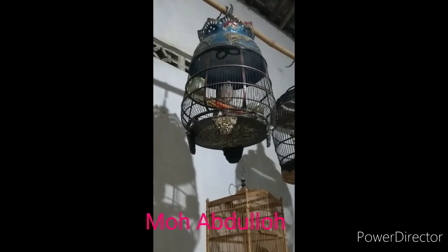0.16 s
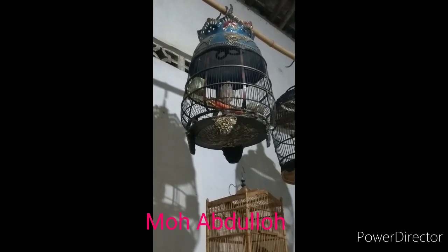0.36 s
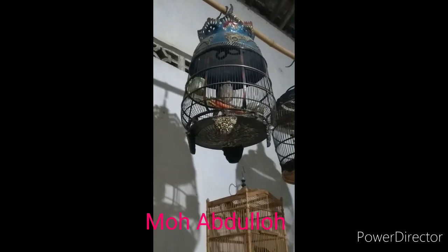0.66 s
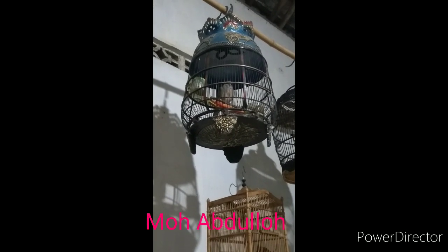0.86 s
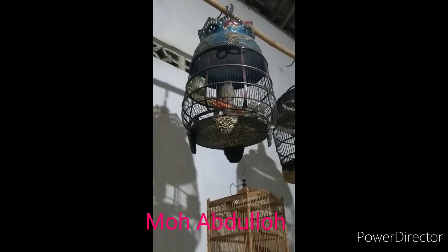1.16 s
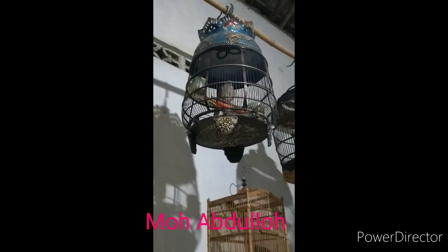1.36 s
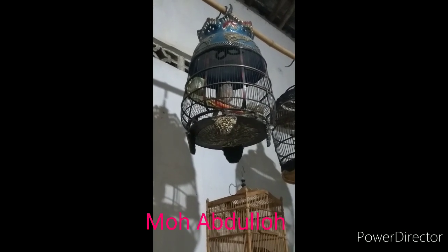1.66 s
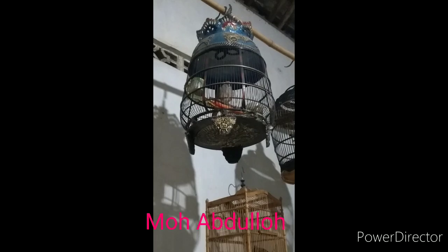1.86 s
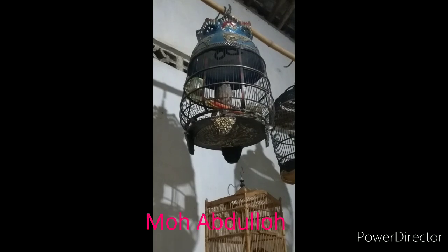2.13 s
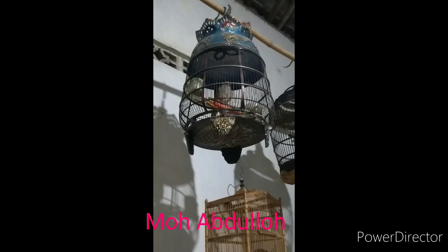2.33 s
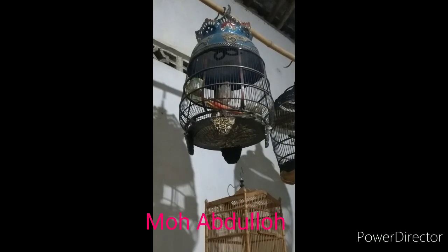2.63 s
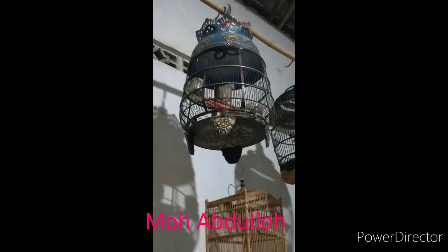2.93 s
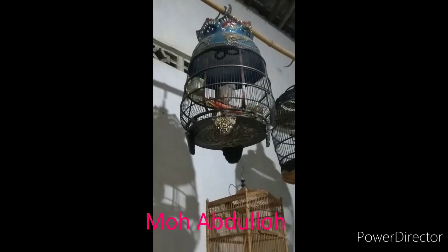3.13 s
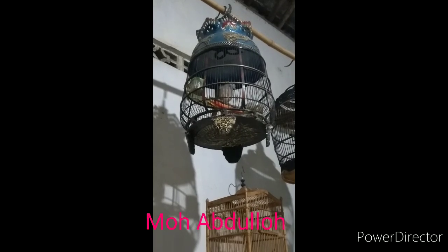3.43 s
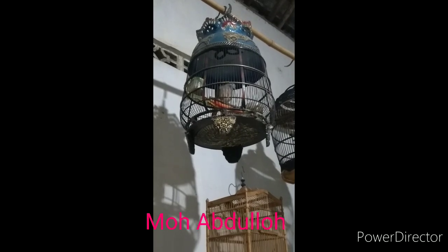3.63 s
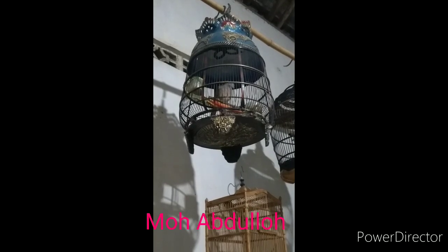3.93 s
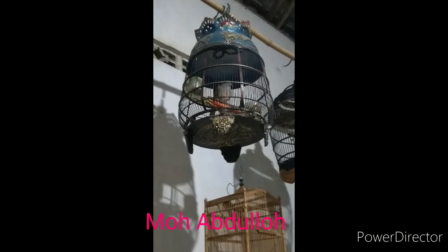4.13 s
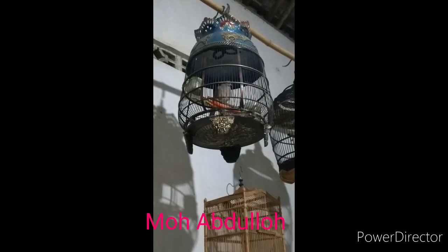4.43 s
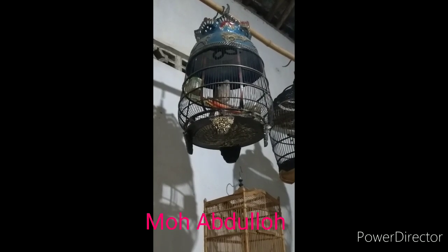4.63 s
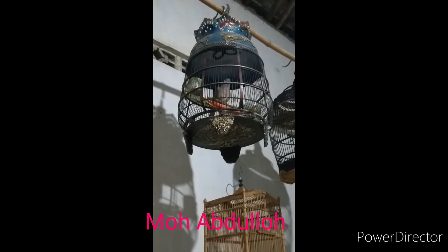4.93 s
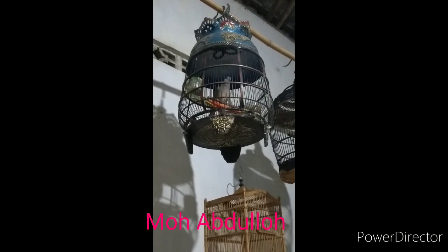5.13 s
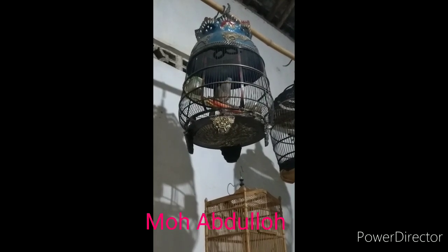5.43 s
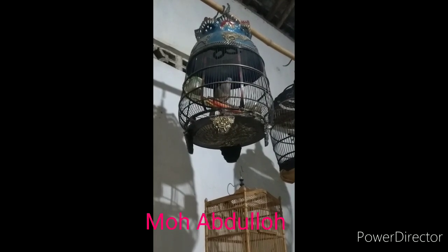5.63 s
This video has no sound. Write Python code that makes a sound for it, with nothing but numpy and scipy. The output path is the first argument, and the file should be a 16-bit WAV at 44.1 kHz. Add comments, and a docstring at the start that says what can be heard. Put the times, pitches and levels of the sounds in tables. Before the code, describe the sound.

Two far, fluttering dove calls and a louder close one ring between porch walls, with light cage rustles and a distant motor hum.

```python
"""Under a porch roof, between hard walls, caged doves coo: two far calls, then a nearer, louder one.
Each note is an almost pure whistle from the bird's voice box that leaps up in pitch and then sags,
blurred by the echo of the walls. A low rumble, a bright hiss and a distant motor's hum go on throughout.
A few rustles and two ticks come from the cages, and a breathy catch leads into the near call."""
import sys
import numpy as np
from scipy import signal
from scipy.fft import rfft, irfft
from scipy.io import wavfile

SR = 44100
rng = np.random.default_rng(int(sys.argv[2]) if len(sys.argv) > 2 else 0)


def unload_wav(signal):
    """Save mono or channel-first audio to the path in sys.argv[1] as 16-bit WAV at rate SR, clipped to [-1, 1]."""
    wavfile.write(
        sys.argv[1],
        SR,
        np.round(np.clip(np.atleast_2d(signal).T, -1, 1) * 32767).astype(np.int16),
    )


N = 254942
HEAD_START = 22050   # samples before time zero, so that echoes are already ringing


def from_db(db):
    """Turn decibels into a number to multiply by."""
    return 10 ** (np.asarray(db) / 20)


def rms_one(x):
    """Scale a signal to an average strength (rms) of 1."""
    return x / np.sqrt(np.mean(x ** 2) + 1e-20)


def at_hz(table, hz):
    """Read between the rows of a (frequency, value) table, with octaves evenly spaced."""
    row_hz, values = np.transpose(table)
    return np.interp(np.log(np.maximum(hz, 1)), np.log(row_hz), values)


def sides(pan_db):
    """Left and right volume; a positive pan is louder on the left."""
    return from_db([[pan_db / 2], [-pan_db / 2]])


def drift(rate, size=N):
    """A smooth random wobble of typical size 1; rate is roughly its changes per second."""
    step = 40   # samples between random points
    memory = np.exp(-2 * np.pi * step * rate / SR)
    slow = signal.lfilter([1], [1, -2 * memory, memory ** 2], rng.standard_normal(size // step + 2002))
    slow = rms_one(slow[2000:])
    return np.interp(np.arange(size) / step, np.arange(len(slow)), slow)


def band(x, low_hz, high_hz):
    """Keep mostly what lies between two frequencies."""
    return signal.sosfilt(signal.butter(2, [low_hz, high_hz], "band", fs=SR, output="sos"), x)


# Dove notes, each opening with a pop: (pop time [s], sag starts after [s], length [s], pop level [dB],
# level after the leap [dB], level at the top [dB], closing level [dB], top pitch [Hz], closing pitch [Hz])
NOTES = [(-.23, 0.19, .265, -12, -35, -36, -33.5, 1225, 1140),
         (0.049, 0.036, .062, -25, -55, -32.5, -34.5, 1120, 1050),
         (0.128, 0.033, 0.0503, -30, -37, -42.5, -34, 1104, 1050),
         (0.236, 0.11, 0.19, -25, -37.5, -40.5, -39.5, 1059, 977),
         (2.386, 0.14, 0.17, -28, -42, -35, -36.5, 1225, 1132),
         (2.582, 0.035, 0.067, -25.5, -34, -42, -34, 1201, 1072),
         (2.664, 0.037, 0.0662, -31, -40.5, -43.5, -36, 1124, 1016),
         (2.762, 0.038, 0.074, -25.5, -34, -47, -38, 1045, 939),
         (2.877, 0.1243, .2, -25.5, -43.5, -35, -46.5, 1141, 994),
         (5.535, 0.0695, 0.19, -18.5, -28, -33, -22, 1351, 1231),
         (5.722, 0.025, .04, -25.5, -20.5, -37, -41, 1168, 1065),
         (5.773, .04, .06, -20.5, -25, -29, -24, 1080, 1070)]
# Faint slides into a call: (time [s], length [s], level [dB], first pitch [Hz], last pitch [Hz])
LEAD_INS = [(2.342, 0.036, -53.5, 1130, 1030), (5.492, 0.047, -41, 1193, 1454)]
def note_shapes(near):
    """The near or far dove's notes, as points to join up: (time [s], pitch [Hz], level [dB])."""
    pop_hz, leap_s, fade_s, near_from_s = 1050, 0.01347, 0.01315, 5.0
    shapes = [[(s, from_hz, db), (s + length, to_hz, db)] for s, length, db, from_hz, to_hz in LEAD_INS]
    for s, sag, length, pop_db, leap_db, top_db, closing_db, top_hz, closing_hz in NOTES:
        close = max(length - fade_s, sag + fade_s)
        shapes.append([(s - .02, 930, pop_db - 20),   # starts low and quiet
                       (s - .008, 1019, pop_db - 9),
                       (s, pop_hz, pop_db),
                       (s + .0038, pop_hz, pop_db - 6.5),
                       (s + leap_s, top_hz - 24.66, leap_db),   # leaps to just under the top
                       (s + sag, top_hz, top_db),
                       (s + close, closing_hz, closing_db),
                       (s + close + fade_s, closing_hz, closing_db - 9)])
    return [shape for shape in shapes if (shape[0][0] > near_from_s) == near]


# How much of the overtones the throat lets out: (frequency [Hz], level next to the whistle [dB])
THROAT = [(2000, -50), (2150, -42), (2550, -41), (2700, -45), (3200, -46), (3900, -56), (4600, -68),
          (5350, -46), (5850, -62), (6350, -36), (6750, -38)]
def dove(shapes, overtones):
    """The voice box whistles into the puffed-up throat, which lets out little but the lowest tone."""
    out = np.zeros(HEAD_START + N)
    pitch_waver = 1 + 0.0052 * drift(rate=59, size=len(out))
    overtone_flicker = from_db(6 * drift(rate=59, size=len(out)))
    for shape in shapes:
        times, hz, level_db = np.transpose(shape)
        at = HEAD_START + np.arange(round(times[0] * SR), min(round(times[-1] * SR), N))
        t = (at - HEAD_START) / SR
        pitch = np.interp(t, times, hz)
        phase = 2 * np.pi * (np.cumsum(pitch * pitch_waver[at]) / SR + rng.random())
        upper_tones = sum(from_db(at_hz(THROAT, k * pitch)) * np.sin(k * phase) for k in overtones)
        tone = np.sin(phase) + overtone_flicker[at] * upper_tones
        soft_ends = np.clip(np.minimum(t - times[0], times[-1] - t) / .005, 0, 1)
        out[at] += np.sqrt(2) * soft_ends * from_db(np.interp(t, times, level_db)) * tone
    flutter = from_db(1.5 * drift(rate=38, size=len(out)))
    return out * pulsing() * flutter


# Quick pulsing in the coos' loudness: (start [s], end [s], rate [pulses per s], depth [0 to 1])
PULSES = [(.253, .47, 32, .95), (2.395, 2.495, 40, .7), (2.888, 3.06, 29, .9), (5.646, 5.75, 45, .85)]
def pulsing():
    """A volume curve that dips with each pulse."""
    volume = np.ones(HEAD_START + N)
    t = np.arange(-HEAD_START, N) / SR
    for start, end, rate, depth in PULSES:
        on = (t > start) & (t < end)
        fade = np.minimum(1, (end - t[on]) * rate)
        volume[on] -= depth * fade * np.sin(np.pi * rate * (t[on] - start)) ** 2
    return volume


# How long the porch rings: (frequency [Hz], time to fade by 60 dB [s])
RING_TIMES = [(500, 0.53), (950, 0.62), (1100, 0.6), (1260, 0.79), (1600, 0.68), (3000, 0.26), (8000, 0.34)]
def porch_echo():
    """The walls throw back a blur of echoes, different in each ear; each band fades at its own speed."""
    t = np.arange(SR) / SR
    edges_hz = 125 * 2. ** np.arange(0, 7.1, .25)
    echo = 0
    for low, high in zip(edges_hz, edges_hz[1:]):
        ring_s = at_hz(RING_TIMES, np.sqrt(low * high))
        noise = band(rng.standard_normal((2, SR)), low, high)
        echo += noise * from_db(-60 * t / ring_s) / np.sqrt(ring_s)
    echo *= 1 - np.exp(-t / .004)   # the first echoes arrive and thicken
    return echo / np.sqrt(np.sum(echo ** 2, axis=1, keepdims=True))


def in_porch(x, echo, pan_db, echo_db, left_lag_samples=0):
    """A sound reaches the ears directly and off the walls; the head start is then dropped."""
    direct = np.stack([np.roll(x, left_lag_samples), x]) * sides(pan_db)
    bounced = signal.fftconvolve(x[None], echo, axes=1)[:, :len(x)]
    bounced *= from_db(echo_db) * sides(pan_db=3)   # the nearer wall is on the left
    return (direct + bounced)[:, HEAD_START:]


# Tone of the low rumble: (frequency [Hz], relative level [dB])
RUMBLE = [(15, -30), (30, 0.5), (64, -0.2), (98, -6.5), (204, -6.5), (267, -9.5), (306, -7), (378, -13),
          (430, -10), (600, -11.5), (780, -9), (1100, -13), (2500, -17.5), (3250, -26), (5500, -121)]
# Tone of the bright hiss: (frequency [Hz], relative level [dB])
HISS = [(1470, -66), (2500, -7), (3020, -5.5), (3900, -5.5), (5020, -5), (5750, -5), (6300, -0.4),
        (7400, 0), (8790, 1.56), (10200, -0.5), (12300, -10.5), (14600, -11.5), (15300, -15.5)]
# How alike the background is in the two ears: (frequency [Hz], likeness [0 to 1])
LIKENESS = [(60, .75), (130, .85), (290, .75), (640, .45), (1400, 0)]
# How far the background leans to the left: (frequency [Hz], left over right [dB])
LEAN = [(60, 0), (130, 1.2), (290, -0.5), (640, 1), (1400, 1.5), (3070, 0), (6750, 4), (14800, 5)]
def background(tone, level_db):
    """Nearly steady noise: alike in both ears in the bass, unrelated in the treble."""
    hz = np.fft.rfftfreq(N, 1 / SR)
    shared, opposite = rfft(rng.standard_normal((2, N)))
    alike = at_hz(LIKENESS, hz)
    ears = np.sqrt(1 + alike) * shared + np.sqrt(1 - alike) * opposite * [[1], [-1]]
    lean = from_db(at_hz(LEAN, hz) / 2 * np.array([[1], [-1]]))
    delay = np.exp(-2j * np.pi * hz * np.array([[.0002], [0]]))   # the left ear hears it 0.2 ms later
    noise = rms_one(irfft(ears * delay * lean * from_db(at_hz(tone, hz)), N))
    return from_db(level_db + .5 * drift(rate=6)) * noise


# Tones of the distant motor: (pitch [Hz], width [Hz], relative level [dB])
MOTOR_TONES = [(207.7, 7.7, -3), (301.7, 12.7, -7), (409, 14, -15)]
def motor_hum():
    """A far motor hums in wavering tones that swell and sink as its load wanders."""
    tones = sum(from_db(db) * rms_one(band(rng.standard_normal(N), hz - width / 2, hz + width / 2))
                for hz, width, db in MOTOR_TONES)
    return tones * from_db(-69.5 + 1.5 * drift(rate=1.8))


def noise_puff(time_s, level_db, fade_s, low_hz, high_hz):
    """Soft noise that swells quickly and dies away, spread wide and a little to the left."""
    out = np.zeros((2, N))
    at = np.arange(round((time_s - .1) * SR), min(round((time_s + .5) * SR), N))
    from_peak = at / SR - time_s
    rise_s = min(0.51 * fade_s, 0.022)
    swell = np.exp(-np.abs(from_peak) / np.where(from_peak < 0, rise_s, fade_s))
    noise = band(band(rng.standard_normal((2, len(at))), low_hz, high_hz), low_hz, high_hz)
    out[:, at] = from_db(level_db) * swell * rms_one(noise)
    return out * sides(pan_db=4.5)


# Stirrings in the cages: (time [s], level [dB], fade time [s], low edge [Hz], high edge [Hz])
RUSTLES = [(2.401, -53.5, 0.18, 2400, 14200), (2.48, -57.5, 0.31, 4040, 13900),
           (2.782, -53.5, 0.11, 219, 696), (2.921, -53.5, 0.034, 3150, 13000),
           (3.164, -59, 0.063, 4450, 5400), (3.18, -54, 0.05, 6030, 13650),
           (3.646, -51.5, 0.046, 6450, 12900), (3.72, -53.5, 0.054, 5060, 13000),
           (5.442, -52, 0.025, 920, 1440)]
def cage_rustles():
    """Rustles and soft bumps in the cages, each one a puff of noise."""
    return sum(noise_puff(*rustle) for rustle in RUSTLES)


# Ticks on a cage: (time [s], level before filtering [dB], low edge [Hz], echo over direct sound [dB])
TICKS = [(2.767, -34.5, 1290, 8.5), (5.3157, -40, 5950, 5.5)]
# The tone that the wire cage gives a tick: (frequency [Hz], boost or cut [dB])
CAGE_TONE = [(200, 0), (500, -10), (1500, 2), (2600, -5.5), (3700, -0.5), (5200, -4.5), (7600, 3),
             (8500, 0.5), (9400, 3.5), (10800, -2.5), (13500, -10.5), (15000, -16)]
def cage_ticks(echo):
    """Each tick is a brief chatter of tiny knocks, coloured by the wire cage."""
    out, chatter_s = 0, .005
    t = np.arange(2048) / SR
    colour = from_db(at_hz(CAGE_TONE, np.fft.rfftfreq(len(t), 1 / SR)))
    fade_in = np.minimum(t * 4000, 1)
    for time_s, level_db, low_hz, echo_db in TICKS:
        chatter = rng.standard_normal(len(t)) * np.exp(-t / chatter_s)
        crack = irfft(rfft(chatter) * colour, len(t)) * fade_in
        at = HEAD_START + round(time_s * SR)
        tick = np.zeros(HEAD_START + N)
        tick[at:at + len(t)] = from_db(level_db) * band(band(crack, low_hz, 17000), low_hz, 17000)
        out += in_porch(tick, echo, pan_db=11.5, echo_db=echo_db)
    return out


def breath_catch():
    """A breathy catch just before the near dove calls."""
    return noise_puff(time_s=5.503, level_db=-41.5, fade_s=0.025, low_hz=660, high_hz=1500)


def scene():
    """Two doves and the sounds of their cages, over rumble, hiss and hum."""
    echo = porch_echo()
    far_coos = dove(note_shapes(near=False), overtones=[])
    near_coos = dove(note_shapes(near=True), overtones=[2, 3, 4, 5])
    far = in_porch(far_coos, echo, pan_db=1.5, echo_db=1, left_lag_samples=9)
    near = in_porch(near_coos, echo[::-1], pan_db=-8.5, echo_db=4, left_lag_samples=11)
    steady = background(RUMBLE, level_db=-57.5) + background(HISS, level_db=-55.5) + motor_hum()
    return far + steady + cage_rustles() + cage_ticks(echo) + breath_catch() + near


def record(dry):
    """Cut away the very highest treble."""
    cutoff_hz = 15400
    return signal.sosfilt(signal.ellip(12, .5, 70, cutoff_hz, fs=SR, output="sos"), dry)


dry = scene()
out = record(dry)
unload_wav(out)
```